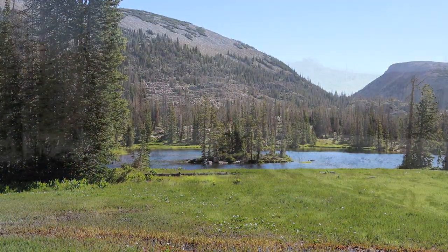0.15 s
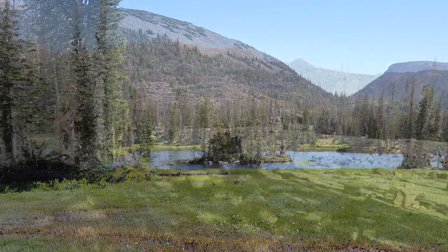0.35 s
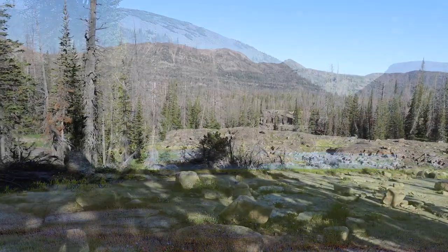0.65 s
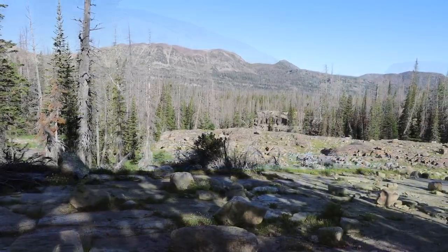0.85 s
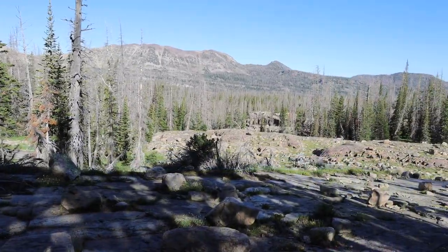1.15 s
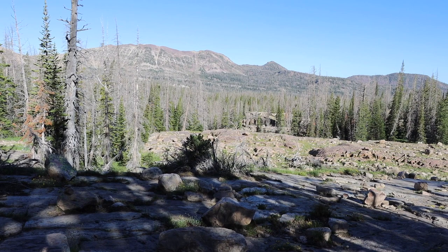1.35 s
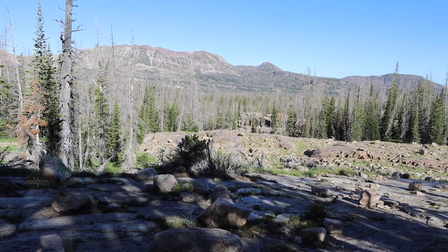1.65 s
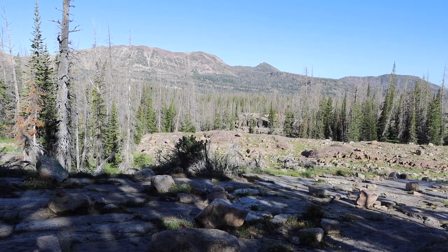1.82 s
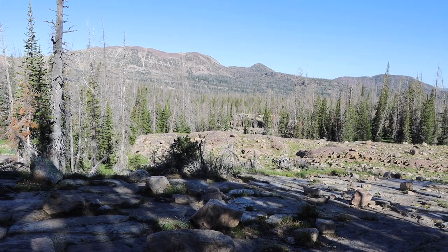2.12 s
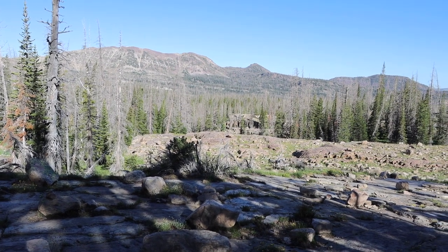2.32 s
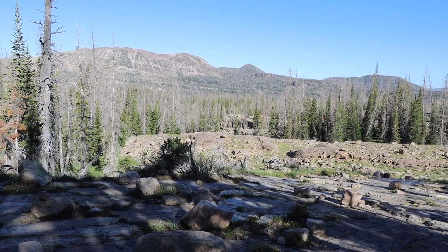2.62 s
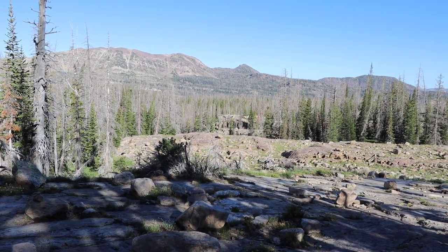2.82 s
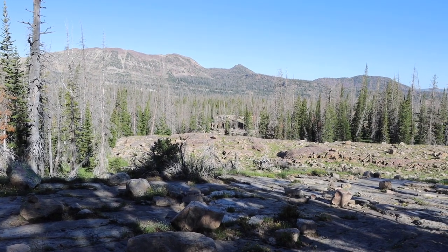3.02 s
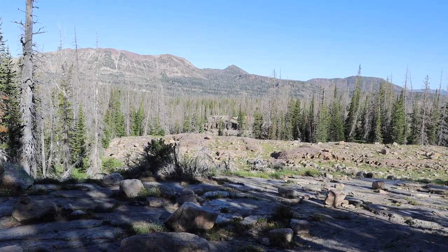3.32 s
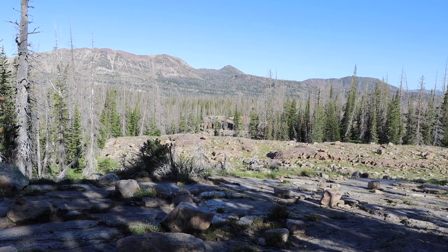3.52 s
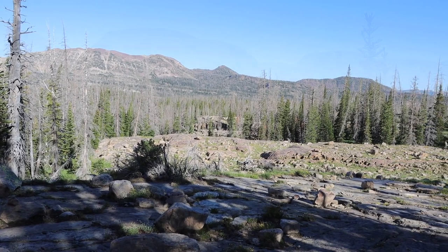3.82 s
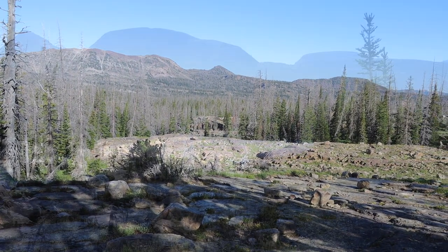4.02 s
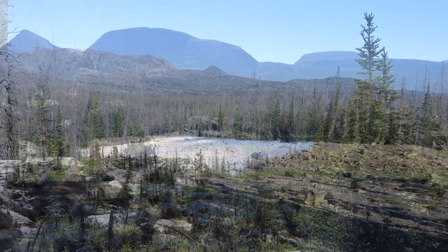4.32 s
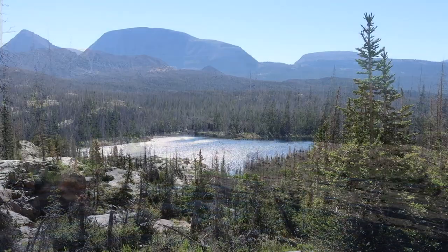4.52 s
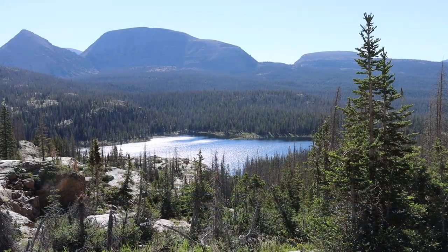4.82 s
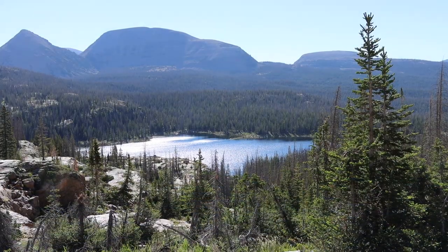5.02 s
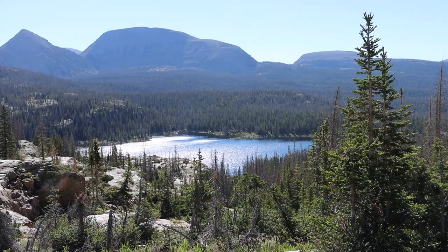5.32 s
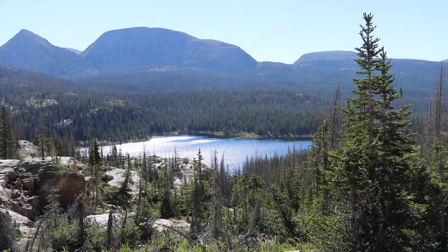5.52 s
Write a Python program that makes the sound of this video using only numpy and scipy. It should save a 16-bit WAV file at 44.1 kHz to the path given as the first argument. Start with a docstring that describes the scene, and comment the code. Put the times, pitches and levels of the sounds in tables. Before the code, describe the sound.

A faint mountain forest background of distant rushing air, low drone and hiss runs throughout, shifting gently in tone during the first second and again around 4 to 4.8 seconds. Light wind rumbles on the microphone at the start, and far birds give tiny, faint whistles at the very beginning and around 1.3 seconds.

At about 1.4 seconds a small bird begins a high, rapid trill of evenly spaced notes, roughly eighteen a second. It swells until 2 seconds, holds as the main sound, and eases off to end near 3.7 seconds, with a short echo from rocks and trees. A few soft bumps and ticks fall around 0.8, 2 and 2.6 seconds.

Faint distant whistles return just after 4 seconds, then a light gust touches the microphone from 4.5 to 5 seconds. A nearer bird gives one raspy chirp at 5.3 seconds, followed by a soft bump.

```python
"""A small bird trills in a mountain forest, a falling and a rising whistle about 18 times a second.
Nearby rock throws the trill back to the microphone, and the trees add a short tail.
Farther off, other birds call faintly; a nearer one chirps near the end.
Under them, three ambiences of far rushing air, valley drone and hiss cross-fade one into the next,
with light wind on the microphone and a few soft bumps."""
import sys
import numpy as np
from scipy import signal
from scipy.fft import rfft, irfft, next_fast_len
from scipy.io import wavfile
from scipy.ndimage import uniform_filter1d, map_coordinates

SR = 44100
rng = np.random.default_rng(int(sys.argv[2]) if len(sys.argv) > 2 else 0)


def wav_out(sig):
    """Save sig, one row per channel (or a flat mono array), as 16-bit PCM at SR to the path in sys.argv[1]."""
    wavfile.write(sys.argv[1], SR, np.round(np.clip(np.atleast_2d(sig).T, -1, 1) * 32767).astype(np.int16))


N = 249560


def amp(db):
    """Decibels to gain."""
    return 10 ** (np.asarray(db) / 20)


def unit(x):
    """x at rms 1."""
    return x / np.sqrt(np.mean(x ** 2) + 1e-20)


def along(points, hz):
    """Rows of f/Hz, value, read on a log frequency axis."""
    f, values = np.transpose(points)
    return np.interp(np.log(hz + 1), np.log(f + 1), values)


def curves(rows):
    """One value per sample for each column after the time."""
    s, *columns = np.transpose(rows)
    return [np.interp(np.arange(N) / SR, s, column) for column in columns]


def filtered(x, response):
    """x through a complex frequency response."""
    size = next_fast_len(N + SR // 2)
    return irfft(rfft(x, size) * response(np.fft.rfftfreq(size, 1 / SR)), size)[..., :N]


def add(track, s, sound):
    """Mix a sound into the track at time s."""
    span = track[max(round(s * SR), 0):][:len(sound)]
    span += sound[:len(span)]


def noise(spectrum, likeness):
    """Stereo noise of rms 1 with a given colour and left-right likeness."""
    turn = lambda hz: np.arccos(np.clip(along(likeness, hz), -1, 1)) / 2
    colour = lambda hz: amp(along(spectrum, hz)) * [np.cos(turn(hz)), np.sin(turn(hz))]
    mid, side = filtered(rng.standard_normal((2, N)), colour)
    return unit(np.array([mid + side, mid - side]))


def whistle(s, hz, db, waver=0.0012):
    """One pure, slightly unsteady tone gliding through the given pitches and levels."""
    t = np.arange(s[0], max(s[-1], s[0] + .005), 1 / SR)
    drift = unit(uniform_filter1d(rng.standard_normal(len(t)), size=90))
    pitch = uniform_filter1d(np.interp(t, s, hz), size=45) * (1 + waver * drift)
    swell = amp(np.interp(t, s, db)) * signal.windows.tukey(len(t), .15)
    return np.sqrt(2) * swell * np.sin(2 * np.pi * np.cumsum(pitch) / SR)


# colours of the background: f/Hz, relative level/dB
RUSH_SPECTRUM = [(120, -14), (220, 2.5), (300, 0.5), (420, -4.5), (800, -2.5), (1300, -2), (2000, -6.5),
                 (3200, -12.5), (6000, -16.5), (12000, -20)]
DRONE_SPECTRUM = [(100, -3), (250, -7), (480, 0), (700, -4.5), (1100, -7), (2500, -40)]
MURK_SPECTRUM = [(20, 4), (60, -8), (130, -2), (220, -4), (500, -8.5), (1000, -14.5), (2500, -26)]
HISS_SPECTRUM = [(200, 1.5), (2000, 1.5), (5000, 1.4), (9000, -0.42), (15500, -1.6)]
# likeness of the microphone's left and right sides: f/Hz, correlation
AIR_LIKENESS = [(30, 0.95), (150, 0.93), (1000, 1), (3000, 1)]
HISS_LIKENESS = [(2000, 0.78), (8000, 0.69), (14000, 0.34)]
# three background ambiences: relative level/dB of rush, drone, hiss
AMBIENCES = [(-65, -63.5, -65), (-59.5, -69, -68), (-65.5, -65, -65.5)]
# cross-fades from each ambience to the next: start t/s, length/s
CROSS_FADES = [(0, 0.98), (3.887, .9)]
def ambience(rush_gain_db=1, murk_db=-64, hiss_gain_db=3):
    """Three ambiences of far rush, drone and hiss cross-fade, dipping at each fade, over a steady murk."""
    t = np.arange(N) / SR
    position = sum(np.clip((t - s) / length, 0, 1) for s, length in CROSS_FADES)
    shares = np.maximum(1 - np.abs(position - np.arange(len(AMBIENCES))[:, None]), 0)
    rush_level, drone_level, hiss_level = np.sqrt(amp(AMBIENCES).T ** 2 @ shares ** 2)
    rush = rush_level * amp(rush_gain_db) * noise(RUSH_SPECTRUM, AIR_LIKENESS)
    drone = drone_level * noise(DRONE_SPECTRUM, AIR_LIKENESS)
    murk = amp(murk_db) * noise(MURK_SPECTRUM, AIR_LIKENESS)
    hiss = hiss_level * amp(hiss_gain_db) * noise(HISS_SPECTRUM, HISS_LIKENESS)
    return rush + drone + murk + hiss


# colour of wind on the microphone: f/Hz, relative level/dB
WIND_SPECTRUM = [(10, -14), (30, 2), (60, -3.5), (100, -11.5), (180, -29), (500, -48)]
# gusts: t/s at full strength, hold/s, relative level/dB
WIND_GUSTS = [(0, .37, -54), (4.51, 0.27, -52.5), (4.79, 0.045, -46.5), (5.04, .05, -54), (5.63, .03, -60)]
def wind(gain_db=-3.5, breeze_db=-68, flutter_db=1.5, flutter_hz=12, attack_s=.05, release_s=0.078):
    """Rumble right on the microphone: a fluttering breeze, and gusts that rise, hold and die away."""
    t = np.arange(N) / SR
    flutter = map_coordinates(rng.standard_normal(N // 100), [t * flutter_hz])
    power = amp(breeze_db + flutter_db * flutter) ** 2
    for s, hold, db in WIND_GUSTS:
        rise = np.clip(1 + (t - s) / attack_s, 0, 1)
        decay = np.exp(-np.maximum(t - s - hold, 0) / release_s)
        power += (amp(db) * rise * decay) ** 2
    return amp(gain_db) * np.sqrt(power) * noise(WIND_SPECTRUM, AIR_LIKENESS)


# whistles far off in the forest: t/s, length/s, start f/Hz, end f/Hz, peak level/dB
FAR_WHISTLES = [(.082, 0.047, 3080, 2950, -69), (1.320, .025, 5100, 5170, -65.5),
                (1.34, 0.043, 3920, 4280, -66), (1.367, 0.026, 3950, 3640, -66),
                (1.397, 0.052, 5350, 3950, -65), (3.335, .05, 3470, 3400, -66.5),
                (4.044, .035, 2520, 2750, -69), (4.107, 0.013, 2000, 2440, -63),
                (4.242, 0.085, 2530, 2720, -69)]
def far_calls(edge_db=-6):
    """Distant birds whistle faintly, each call one straight glide that swells and fades."""
    track = np.zeros(N)
    course = np.array([0, .4, 1])  # start, loudest point and end, as shares of the length
    for s, length, from_hz, to_hz, db in FAR_WHISTLES:
        pitch = from_hz + (to_hz - from_hz) * course
        levels = [db + edge_db, db, db + edge_db]
        add(track, s, whistle(s + length * course, pitch, levels, waver=0.0096))
    return track


def scatter(x, t60, width=0.0083, first_echo_s=.004):
    """Echoes from trunks and ground, dying away and nearly alike on both sides of the microphone."""
    t = np.arange(SR * 3 // 4) / SR
    mid, side = rng.standard_normal((2, len(t))) * amp(-60 * t / t60) * (t > first_echo_s)
    tail = np.array([mid + width * side, mid - width * side]) / np.linalg.norm(mid)
    return signal.fftconvolve(x[None], tail, axes=1)[:, :N]


def forest(x, near_db, far_db):
    """Direct sound, quick scatter from near trees and a longer tail from far ones."""
    return x + amp(near_db) * scatter(x, t60=.1) + amp(far_db) * scatter(x, t60=0.44)


# soft bumps and ticks: t/s, level/dB, centre f/Hz, t60/s
SOFT_BUMPS = [(0.822, -49, 65, 0.21), (0.83, -68, 190, 0.081), (1.955, -48, 259, 0.076),
              (1.957, -49, 880, 0.054), (2.098, -44.5, 50.3, 0.14), (2.098, -56, 204, 0.13),
              (2.609, -43, 940, 0.027), (4.479, -56, 1600, .05), (5.645, -52, 670, 0.085)]
def bumps(attack_s=0.00042):
    """Each bump is a dying puff of noise in one broad resonance."""
    track, t = np.zeros(N), np.arange(SR // 4) / SR
    for s, db, hz, t60 in SOFT_BUMPS:
        body = signal.butter(2, [hz * 0.67, hz * 1.37], "band", fs=SR, output="sos")
        puff = unit(signal.sosfilt(body, rng.standard_normal(len(t))))
        envelope = amp(db - 60 * t / t60) * (1 - np.exp(-t / attack_s))
        add(track, s, puff * envelope)
    return track


# pace of the trill: t/s, syllable rate/Hz
TRILL_TEMPO = [(1.4, 17.792), (1.98, 18.358), (2.18, 17.666), (2.93, 17.624), (3.3, 17.926), (3.6, 16.877)]
def syllable_times(start_s=1.3977, syllables=41):
    """The trilling bird hurries a little at first and slows at the end."""
    times = [start_s]
    while len(times) < syllables:
        rate_hz = np.interp(times[-1], *np.transpose(TRILL_TEMPO))
        times.append(times[-1] + 1 / rate_hz)
    return np.array(times)


def notes(times, glide, effort_db, reach, settled_hz, sharp_hz, settle_s=0.2, spread_hz=42, spread_db=0.64):
    """The bird repeats one glide, starting sharp and settling, each note a little different."""
    track = np.zeros(N)
    s, sweep_hz, shape_db = np.transpose(glide)
    for when in times:
        now = round(when * SR)
        off_pitch, off_level = rng.standard_normal(2)
        centre_hz = settled_hz + sharp_hz * np.exp((times[0] - when) / settle_s) + spread_hz * off_pitch
        stretch = np.where(sweep_hz > 0, reach[now], 1)  # only the top of the sweep widens
        levels = shape_db + effort_db[now] + spread_db * off_level
        add(track, when + s[0], whistle(s, centre_hz + sweep_hz * stretch, levels))
    return track


# course of each note about its centre: t/s, offset f/Hz before stretching, relative level/dB
FALLING_NOTE = [(-.011, 780, -18), (-.0066, 810, -14), (-.005, 640, -2), (-.0041, 110, -4),
                (-.0025, -40, -.6), (-.0008, -185, -2.7), (.0012, -280, -6.2), (.0033, -500, -16)]
RISING_NOTE = [(-.011, -430, -17), (-.0078, -280, -10.5), (-.0069, -245, -2.4), (-.0045, -45, 1),
               (-.0028, 190, -.7), (-.0002, 335, -5.7), (.0014, 335, -8.3), (.0033, 420, -21)]
# stretch of the rising notes' top, widest early in the trill: t/s, factor
RISE_REACH = [(1.4, 1.9), (1.8, 2.3), (2.1, 1.7), (2.6, 1.6), (3.5, 1.58), (3.68, 1.95)]
# the trill swells, holds and eases off: t/s, relative level/dB of falling notes, of rising notes
TRILL_EFFORT = [(1.4, -69, -66), (1.49, -60, -57), (1.72, -48.5, -49), (1.98, -43, -46), (2.42, -44, -45.5),
                (2.95, -42.2, -42.5), (3.5, -42, -42), (3.68, -45.5, -45.8)]
def trill(rise_lag_s=.0229):
    """The small bird sings each syllable as a falling whistle with a rising one just behind it."""
    times = syllable_times()
    fall_reach = np.full(N, 1.062)
    rise_reach, = curves(RISE_REACH)
    fall_db, rise_db = curves(TRILL_EFFORT)
    falls = notes(times, FALLING_NOTE, fall_db, fall_reach, settled_hz=4317, sharp_hz=400)
    rises = notes(times + rise_lag_s, RISING_NOTE, rise_db, rise_reach, settled_hz=5922, sharp_hz=640)
    return falls + rises


# paths off nearby rock, against the screened direct path to the microphone: delay t/s, level/dB
ROCK_ECHOES = [(.004405, 0), (.005057, -5), (.005875, -18), (.008727, -11), (.01503, -14.4),
               (.01665, -13.5), (.020725, -17)]
def rocks(x):
    """Close reflections, together louder than the direct sound, double each sweep and ripple it."""
    echoes = lambda hz: sum(amp(db) * np.exp(-2j * np.pi * hz * delay) for delay, db in ROCK_ECHOES)
    return filtered(x, lambda hz: 1 + echoes(hz))


# one two-voiced chirp, a list of points for each stroke: t/s, f/Hz, level/dB
CHIRP_STROKES = [
    [(5.266, 2560, -59), (5.273, 2780, -63), (5.283, 4200, -59), (5.286, 4500, -66)],
    [(5.276, 1760, -66), (5.285, 2720, -54.5), (5.298, 3350, -58.5), (5.310, 3450, -55.5),
     (5.327, 3520, -68)],
    [(5.296, 2190, -72), (5.313, 2240, -69), (5.319, 2240, -55), (5.325, 2450, -63)],
    [(5.328, 3400, -57), (5.332, 2510, -49), (5.336, 1630, -55.5), (5.340, 1350, -82)],
]
def chirp():
    """A bird nearer the microphone chirps once in overlapping strokes, raspy with wavering pitch."""
    track = np.zeros(N)
    for stroke in CHIRP_STROKES:
        s, hz, db = np.transpose(stroke)
        add(track, s[0], whistle(s, hz, db, waver=0.016))
    return track


def scene():
    """The birds among the trees, over the cross-fading mountain ambiences."""
    triller = forest(rocks(trill()), near_db=-18.5, far_db=-9.8)
    far_birds = forest(far_calls(), near_db=-10, far_db=-11)
    near_bird = forest(chirp(), near_db=-6.5, far_db=-14)
    return triller + far_birds + near_bird + bumps() + ambience() + wind()


def record(dry, top_hz=15780):
    """The microphone chain passes nothing above its band limit."""
    return filtered(dry, lambda hz: hz < top_hz)


dry = scene()
out = record(dry)
wav_out(out)
```